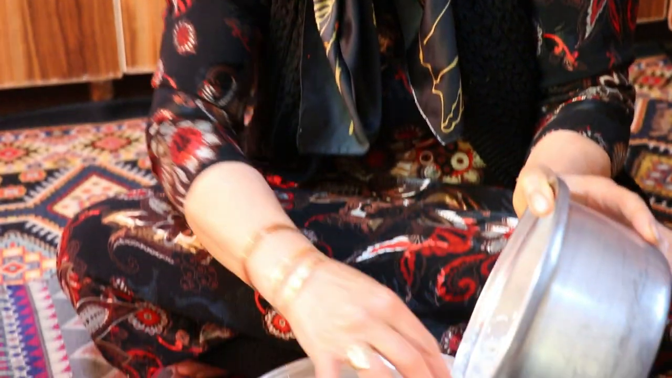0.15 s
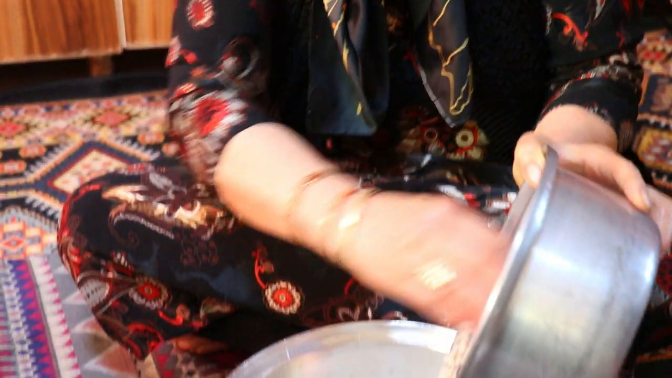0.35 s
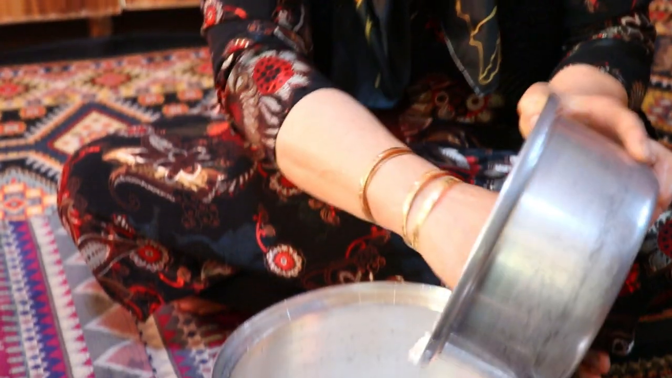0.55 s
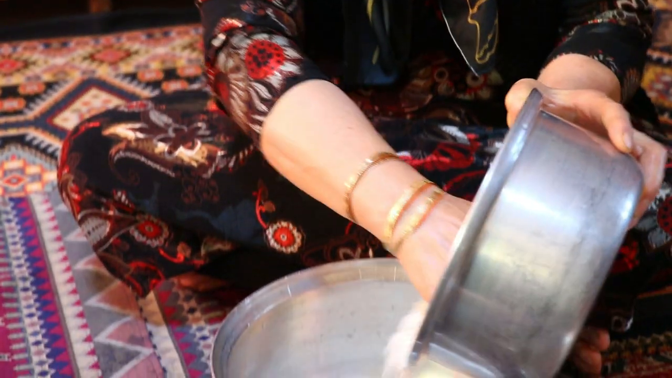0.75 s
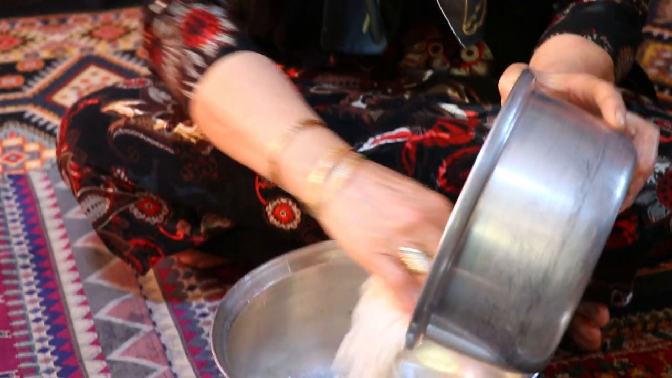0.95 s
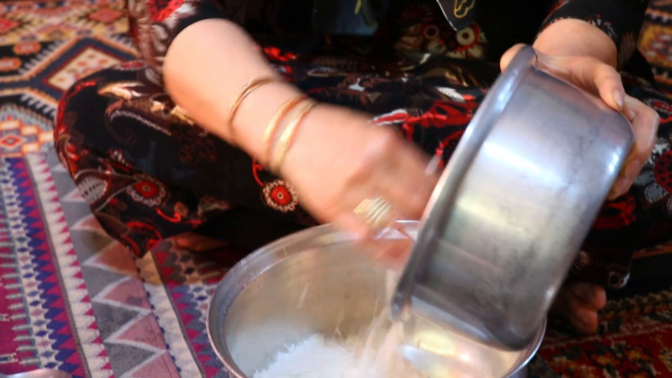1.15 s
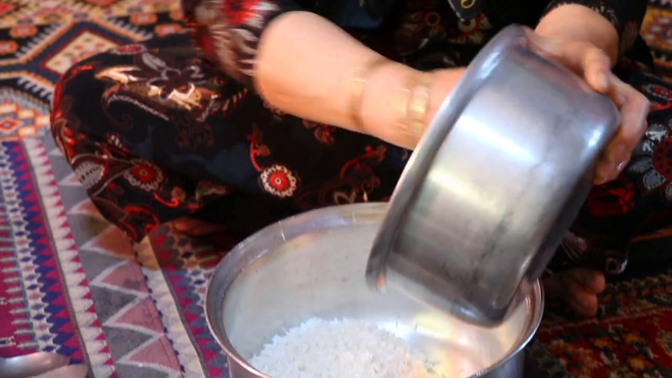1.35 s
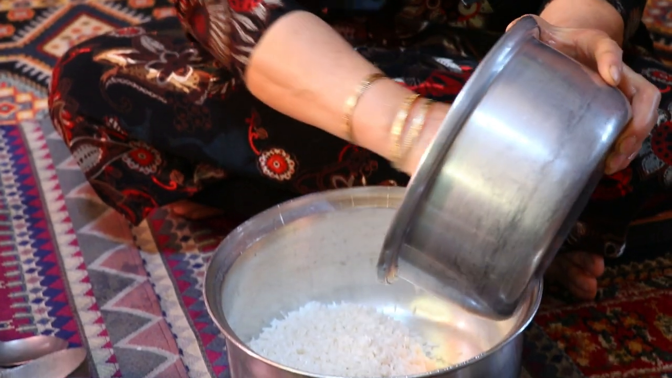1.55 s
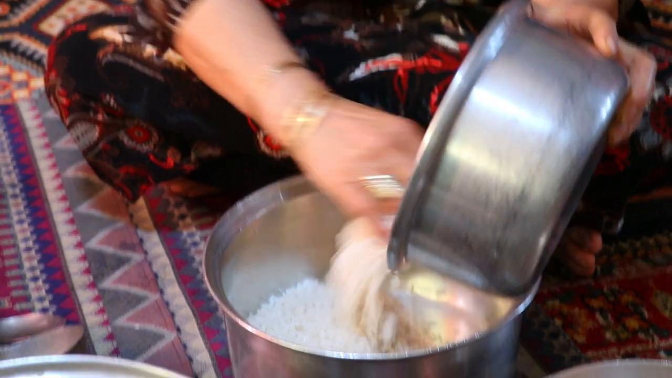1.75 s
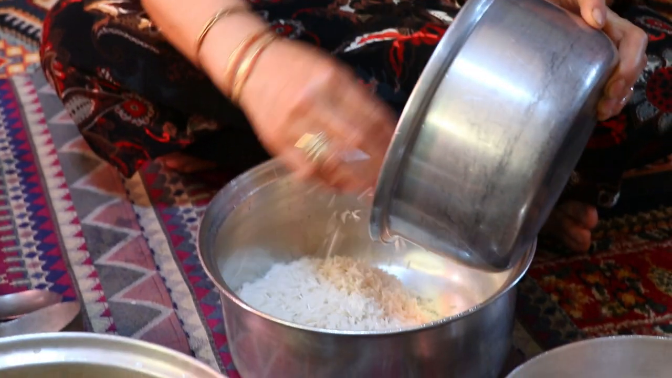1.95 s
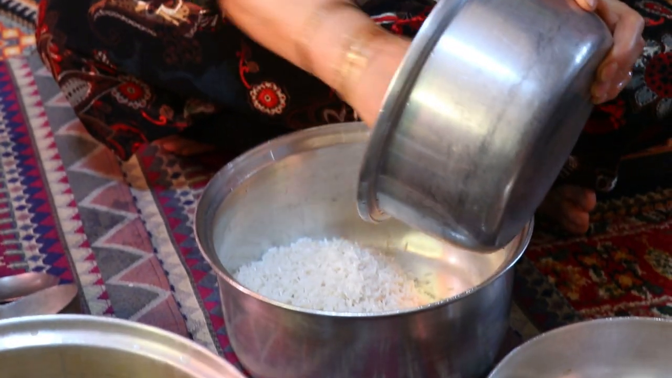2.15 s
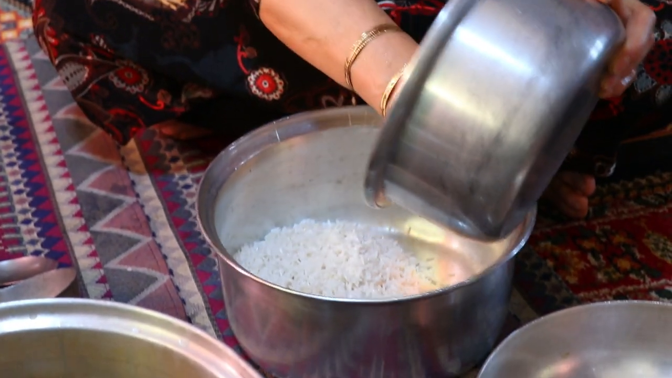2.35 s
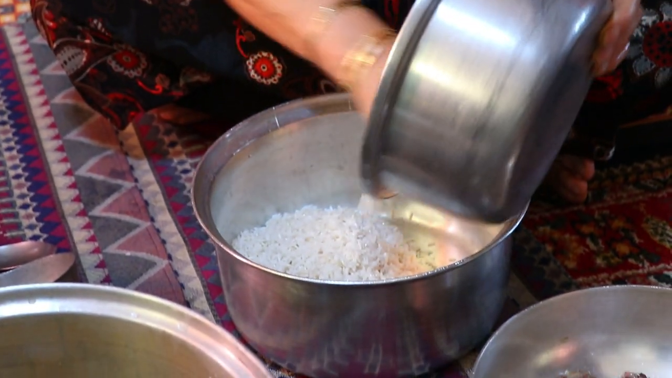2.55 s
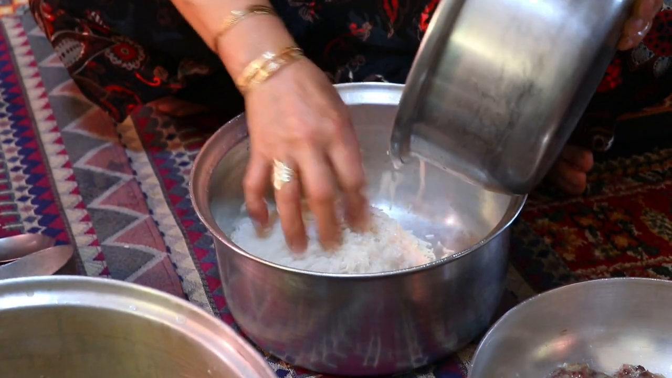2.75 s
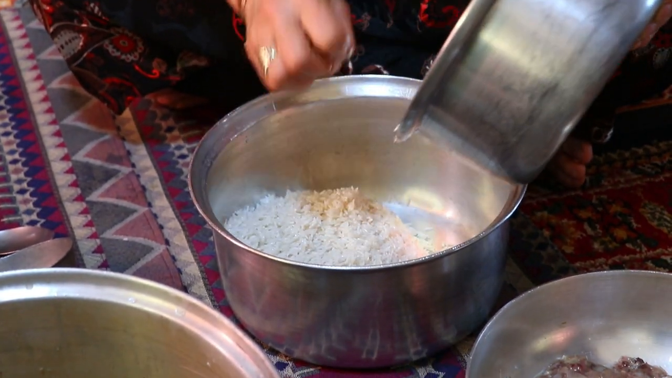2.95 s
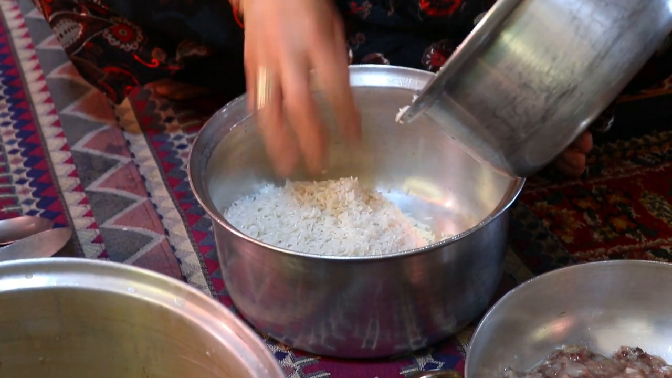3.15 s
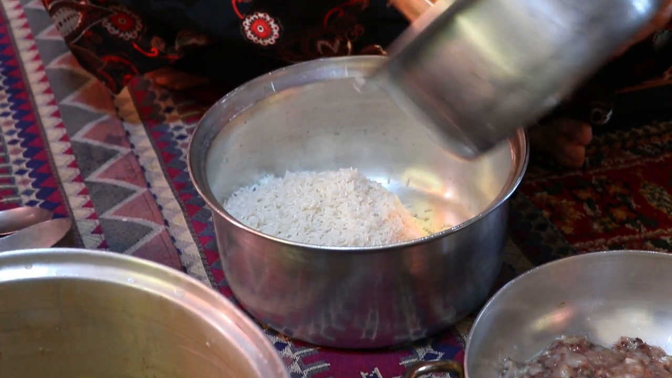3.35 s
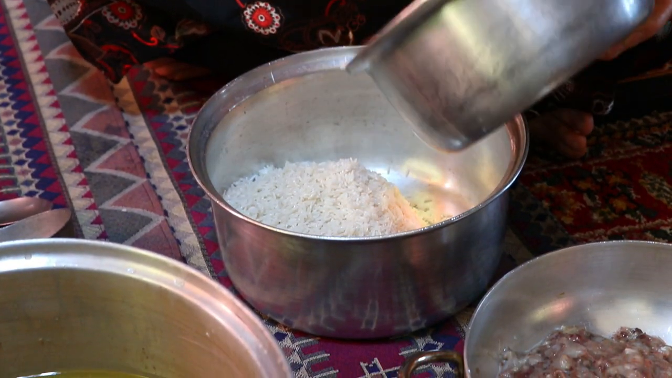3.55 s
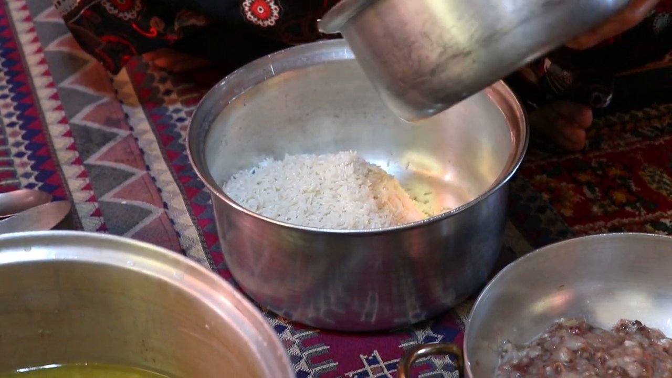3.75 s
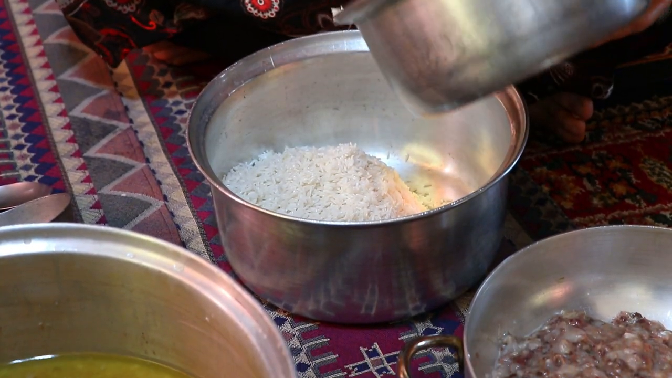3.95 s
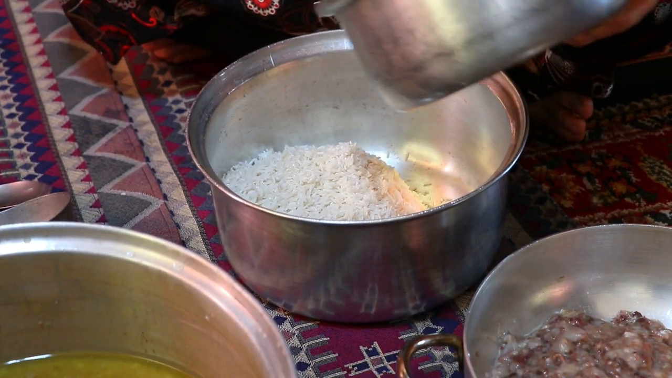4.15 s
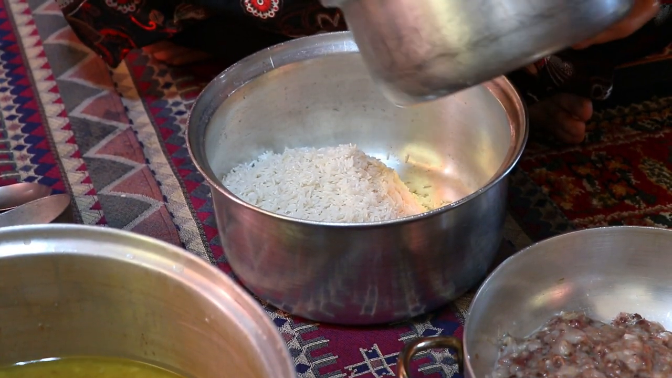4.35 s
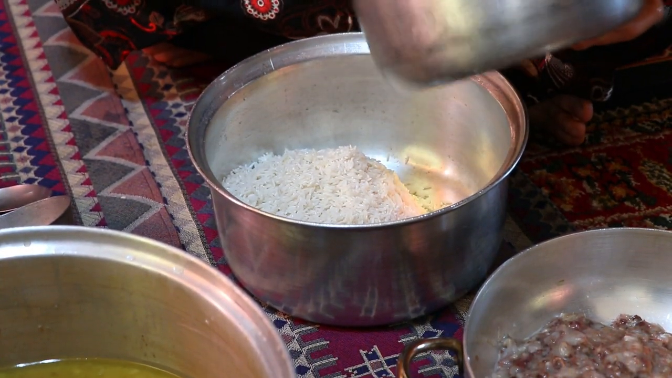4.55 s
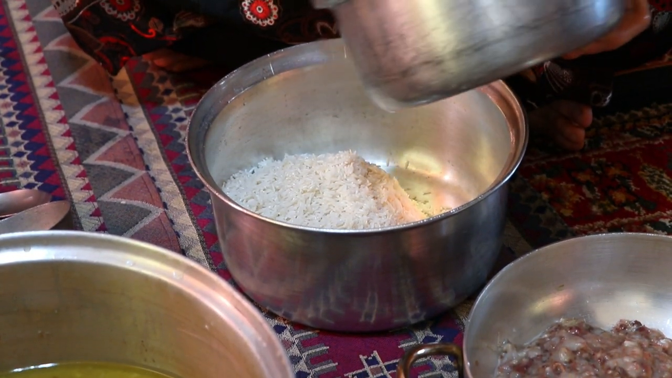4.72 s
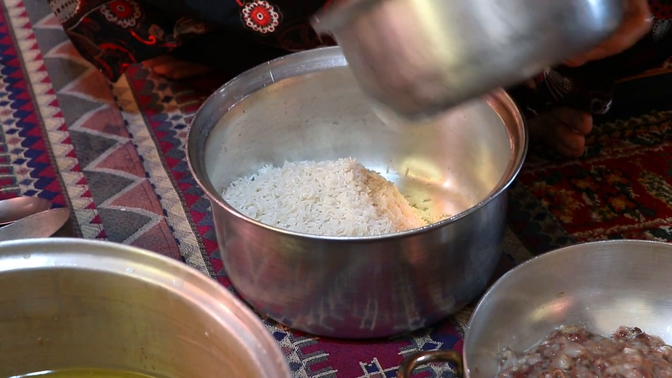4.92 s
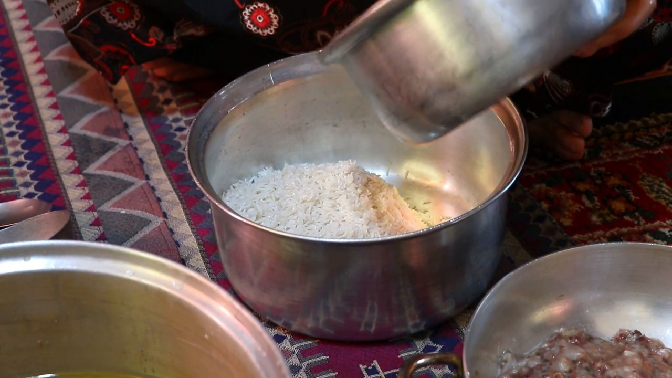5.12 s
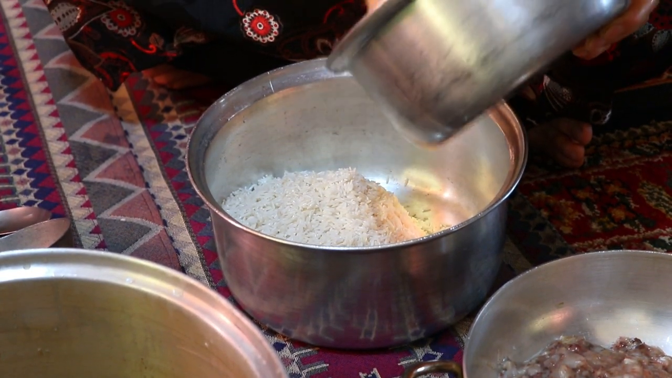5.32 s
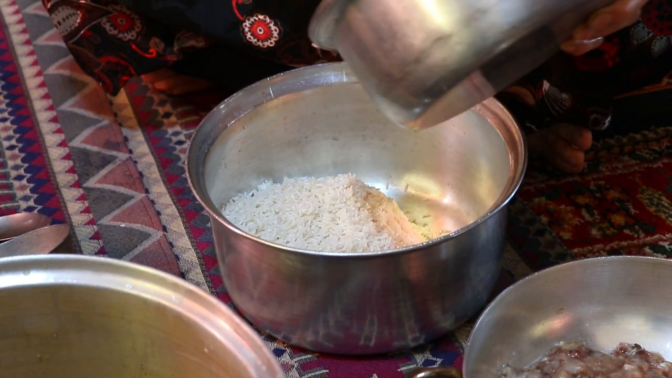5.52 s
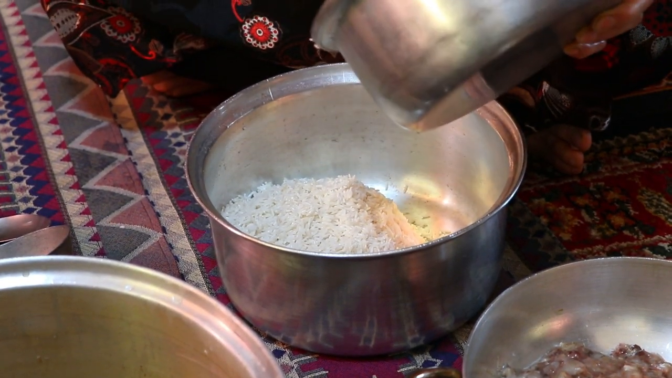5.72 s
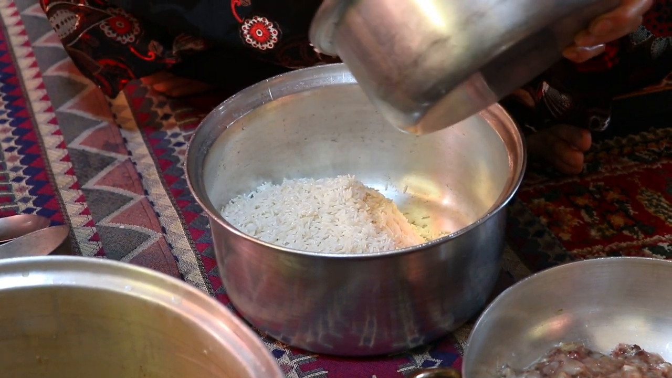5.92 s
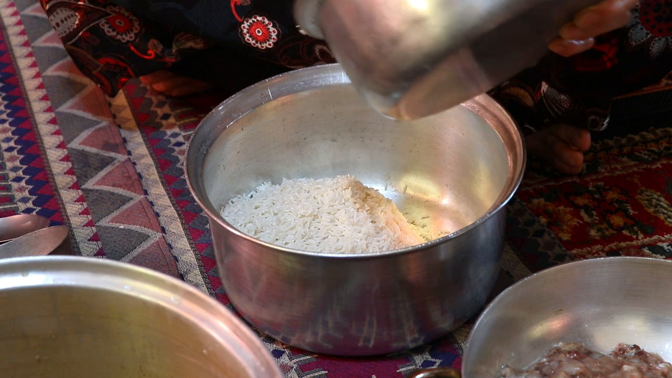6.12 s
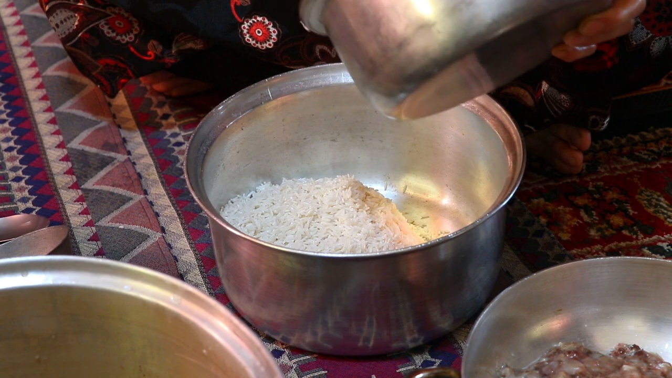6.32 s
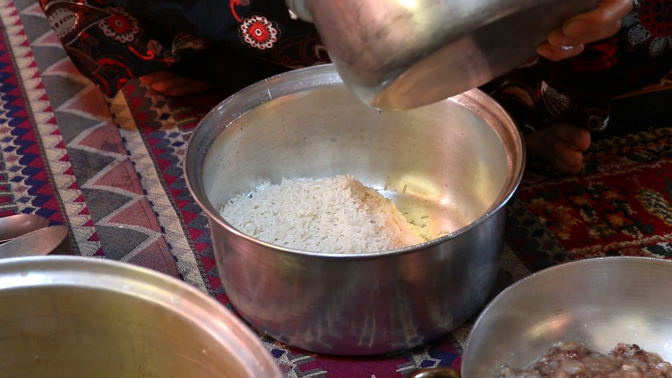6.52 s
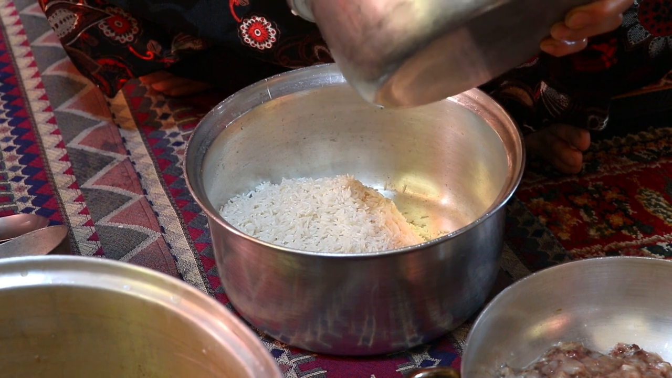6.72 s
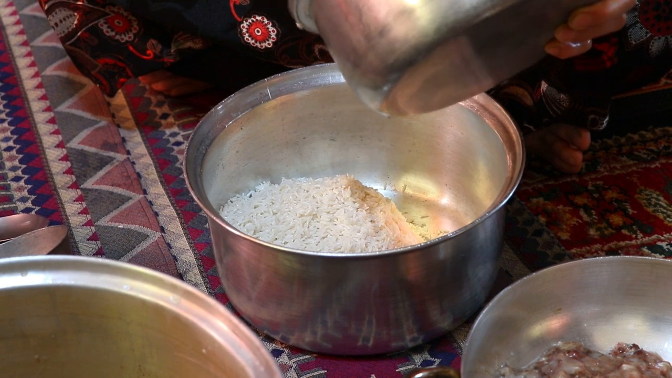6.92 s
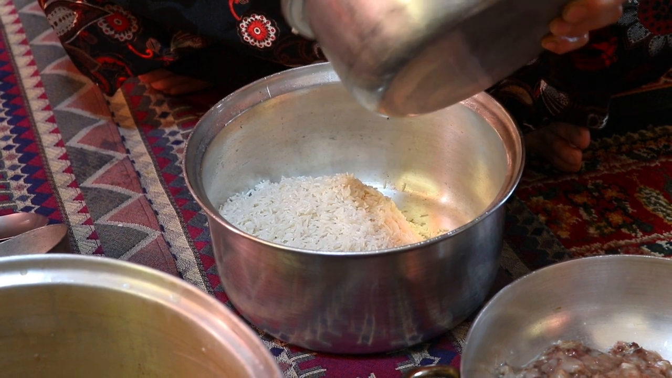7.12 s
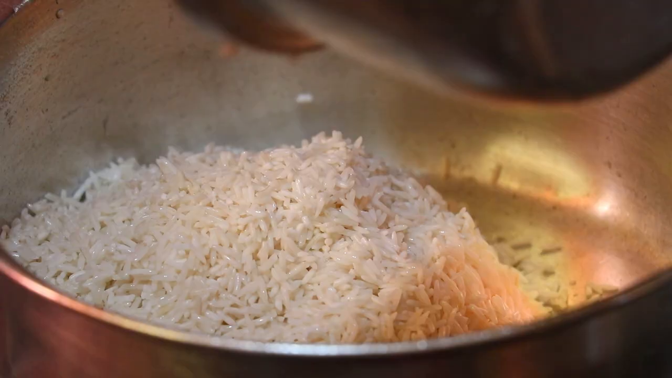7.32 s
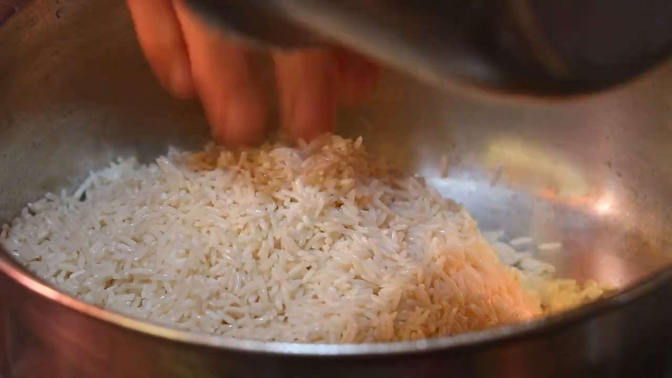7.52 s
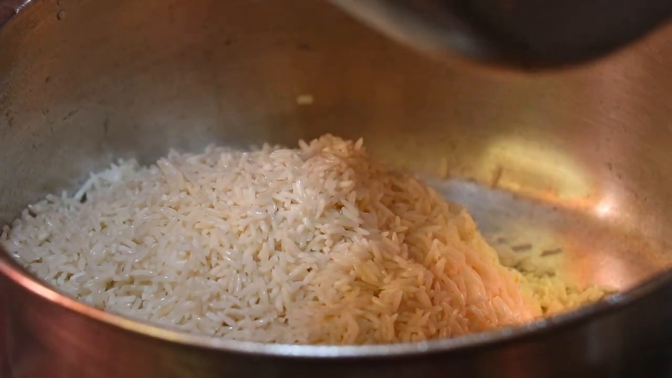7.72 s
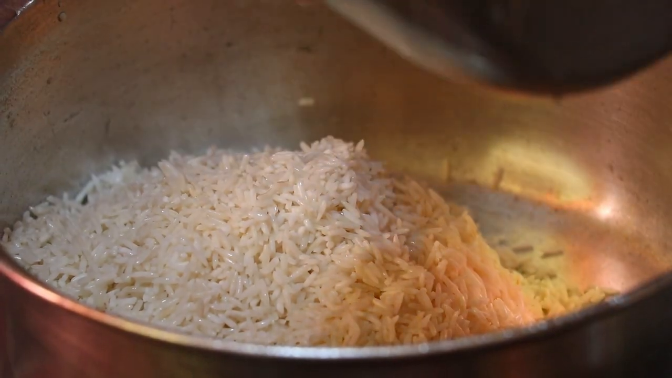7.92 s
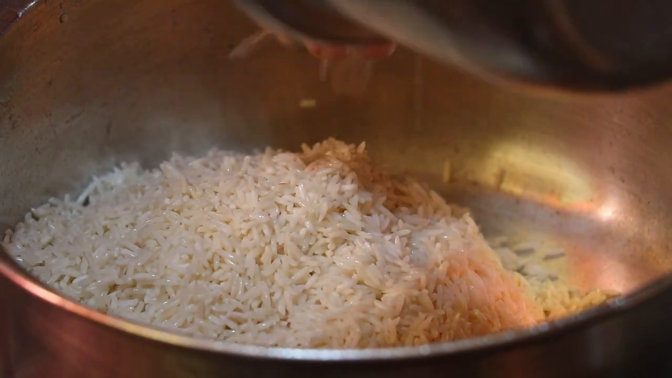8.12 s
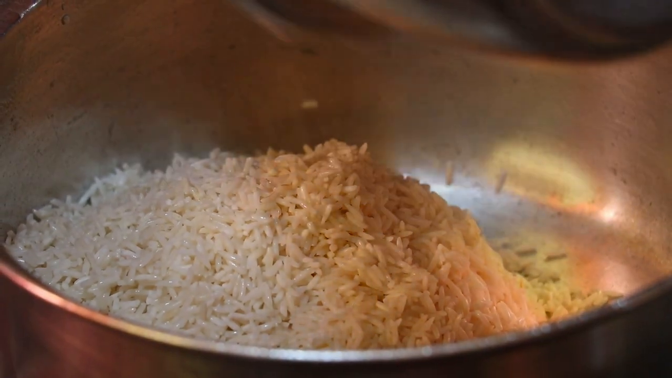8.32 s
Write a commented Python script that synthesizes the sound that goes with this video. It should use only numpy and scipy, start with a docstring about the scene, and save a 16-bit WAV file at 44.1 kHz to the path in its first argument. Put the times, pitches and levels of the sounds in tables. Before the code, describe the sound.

Close up in a quiet room, a hand scoops dry rice from one steel pot into another. Handfuls hiss over the metal and patter down while the hand knocks the pot and bangles jingle. After about three seconds it gets quieter, as fingers wipe out the last grains in short rubbing strokes with small ticks. Jewellery clacks hard on the rim once, and the wiping carries on.

```python
"""Dry rice scooped by hand from a tilted steel pot into a larger one on a carpet, close up in stereo.
For the first three seconds the hand knocks the pot, handfuls hiss over the steel and patter down,
and bangles jingle. Then the fingers wipe out the last grains stroke by stroke, sticking and slipping
on the wall, with small ticks. At 5.5 s jewellery clacks hard on the rim, and the wiping carries on."""
import sys
import numpy as np
from scipy import signal
from scipy.fft import rfft, irfft, next_fast_len
from scipy.io import wavfile

SR = 44100
rng = np.random.default_rng(int(sys.argv[2]) if len(sys.argv) > 2 else 0)


def to_wav(s):
    """Save 16-bit WAV."""
    ch = np.atleast_2d(s).T  # columns
    pcm = np.round(np.clip(ch, -1, 1) * 32767)  # PCM
    wavfile.write(sys.argv[1], SR, pcm.astype(np.int16))


N = 373527
AGE = np.arange(SR // 2) / SR  # time since a blow [s]

# how alike the two microphones hear a sound: (frequency [Hz], left-right correlation [0-1])
MIC_LIKENESS = [(30, 0.84), (130, 0.8), (500, 0.75), (2000, 0.41), (4000, 0.56), (8000, 0.57),
                (14000, 0.35)]
# spectra of a hard snap on steel and of crunching grains: (frequency [Hz], level [dB])
SNAP_SPECTRUM = [(200, -10), (900, -2.5), (2000, -6.5), (3000, -8.5), (5000, -6), (7300, 5), (10000, -2),
                 (13000, -8), (16000, -19)]
CRUNCH_SPECTRUM = [(200, -30.5), (700, 1), (1000, -11), (1400, -3), (2100, -2), (3000, 2.5), (3900, -1),
                   (4900, -9.5), (6500, -4), (12000, -21.5)]


def amp(db):
    """Decibels to gain."""
    return 10 ** (np.asarray(db) / 20)


def unit(x):
    """Scales to rms 1."""
    return x / np.sqrt(np.mean(x ** 2) + 1e-20)


def read(points, hz):
    """Reads a table on a log-frequency axis."""
    f, value = np.transpose(points)
    return np.interp(np.log(hz + 1), np.log(f), value)


def add(mix, s, sound):
    """Mixes a stereo sound in at time s."""
    part = mix[:, max(round(s * SR), 0):][:, :sound.shape[1]]
    part += sound[:, :part.shape[1]]


def tilt(points):
    """Filter gain from a smooth spectrum."""
    return lambda hz: amp(read(points, hz))


def body(peaks):
    """Filter gain from a set of resonances with steep skirts."""
    return lambda hz: np.sqrt(sum(amp(db) ** 2 / (1 + ((hz - f) / width) ** 2) ** 2
                                  for f, width, db in peaks))


def noise(drive, colour):
    """Coloured noise of strength drive at two microphones: alike in the bass, less so in the treble."""
    n = next_fast_len(len(drive))
    hz = np.fft.rfftfreq(n, 1 / SR)
    shared, apart = rfft(rng.standard_normal((2, len(drive))) * drive, n)
    same = np.clip(read(MIC_LIKENESS, hz), 0, 1)
    mid, side = shared * np.sqrt(1 + same), apart * np.sqrt(1 - same)
    return unit(irfft(np.array([mid + side, mid - side]) * colour(hz), n)[:, :len(drive)])


def grains(per_s, spread_db, clump_db, clump_s):
    """Tiny impacts of uneven size that come in clumps."""
    sizes = amp(spread_db * np.minimum(rng.exponential(1, N), 4))
    clumps = unit(signal.lfilter([1], [1, -np.exp(-1 / (clump_s * SR))], rng.standard_normal(N)))
    return (rng.random(N) < per_s / SR) * sizes * amp(clump_db * clumps)


def burst(points, t60, tail_db, tail_t60):
    """A contact that sets off countless close modes: a quick fall, then a weaker tail."""
    fall = amp(-60 * AGE / max(t60, 1e-3)) + amp(tail_db - 60 * AGE / tail_t60)
    return unit(noise(np.ones(len(AGE)), tilt(points)) * fall) * np.sqrt(np.mean(fall ** 2))


def ring(modes, vary_db):
    """Dying modes, weighted anew by each blow; high ones reach the two microphones out of step."""
    hz, db, t60 = np.transpose(modes)[:, :, None]
    weight = rng.standard_normal((len(modes), 1))
    same = np.clip(read(MIC_LIKENESS, hz), 0, 1)
    offset = rng.choice([-1, 1], (len(modes), 1)) * np.arccos(same) / 2
    polarity = (-1) ** np.arange(len(modes))[:, None]
    fall = polarity * amp(db + vary_db * weight - 60 * AGE / t60)
    pair = [(fall * np.sin(2 * np.pi * hz * AGE + side * offset)).sum(0) for side in (1, -1)]
    return np.array(pair) / np.linalg.norm(amp(db))


def strokes(rows, attack_s, release_t60):
    """Gain from (start [s], length [s], level [dB], swell [dB]): each rises, swells or sags, dies."""
    t = np.arange(0, N, 32) / SR
    start, length, db, swell_db = np.transpose(rows)[:, :, None]
    age = t - start
    hold_db = db + swell_db * (np.clip(age / length, 0, 1) - .5)
    release_db = 60 * np.maximum(age - length, 0) / release_t60
    gain = np.clip(age / attack_s, 0, 1) * amp(hold_db - release_db)
    return np.interp(np.arange(N) / SR, t, np.linalg.norm(gain, axis=0))


def room_tone():
    """Steady room noise with a faint hum."""
    # noise spectrum and hum tones: (frequency [Hz], level [dB])
    air_spectrum = [(25, -13), (70, -8), (130, -6), (270, -11.5), (450, -11.5), (620, -13), (850, -22),
                    (1500, -21.5), (2500, -22.5), (4800, -31.5), (7000, -27.5), (11000, -30.5),
                    (16000, -41.5)]
    hum_tones = [(118.4, -76), (441.4, -69)]
    t = np.arange(N) / SR
    hum = sum(amp(db) * np.sqrt(2) * np.sin(2 * np.pi * (hz * t + rng.random())) for hz, db in hum_tones)
    return amp(-61.5) * noise(np.ones(N), tilt(air_spectrum)) + hum


def room_tail(x):
    """The short reverberation of a carpeted room."""
    decay_times = [(200, 0.28), (1000, 0.53), (4000, 0.34), (12000, 0.18)]  # (frequency [Hz], t60 [s])
    hz, t, spectra = signal.stft(noise(np.ones(len(AGE)), np.ones_like), SR, nperseg=256)
    fall = amp(-60 * t / read(decay_times, hz)[:, None])
    tail = signal.istft(spectra * fall, SR, nperseg=256)[1][:, :len(AGE)]
    tail *= np.minimum(AGE / 0.018, 1)
    return signal.fftconvolve(x, tail / np.linalg.norm(tail[0]), axes=1)[:, :N]


def inside_pot(x, bounce_db, bounce_t60):
    """Treble bounces to and fro between the steel walls, which sing along at their own pitches."""
    steel_peaks = [(1432, 14, 7), (4063, 25, 3), (5362, 12, 4), (6474, 16, 3.5), (7356, 16, 4),
                   (8604, 10, 5), (10788, 16, 5)]  # sharp wall resonances: (frequency [Hz], width [Hz], gain [dB])
    bounces = noise(np.ones(len(AGE)), lambda hz: hz ** 2 / (hz ** 2 + 2500 ** 2))
    bounces *= amp(-60 * AGE / bounce_t60)
    x = x + amp(bounce_db) * signal.fftconvolve(x, bounces / np.linalg.norm(bounces[0]), axes=1)[:, :N]
    n = next_fast_len(N)
    hz = np.fft.rfftfreq(n, 1 / SR)
    sing = 1 + sum((amp(db) - 1) / (1 + 2j * (hz - f) / width) for f, width, db in steel_peaks)
    return irfft(rfft(x, n) * sing, n)[:, :N] / np.hypot(1, amp(bounce_db))


def ticks():
    """Nails and grain clumps hit the steel: a bright snap, and a clink pitched by where they strike."""
    contacts = [(0.0763, -24, -41, 1150, 0.014), (0.1235, -22, -35, 3680, 0.0029),
                (0.173, -21.5, -34, 1065, 0.0078), (0.3307, -30, -54, 3200, 0.004),
                (0.3935, -26.5, -64, 1640, 0.00084), (0.4568, -25.5, -45, 2500, 0.002),
                (0.4944, -24.5, -43, 1550, 0.00077), (0.586, -45, -48, 1840, 0.011),
                (0.8427, -28.5, -44, 1360, 0.0039), (1.4019, -36, -58, 1210, 0.0038),
                (1.482, -36.5, -72, 1130, 0.0029), (1.921, -33.5, -54, 3260, 0.0028),
                (1.939, -36, -58, 3260, 0.003), (2.9107, -30.5, -48, 2380, 0.0016),
                (4.1263, -43, -52.5, 1490, 0.0027), (4.1989, -38.5, -49.5, 2930, 0.0027),
                (4.472, -33.5, -49.5, 2820, 0.0025), (4.784, -43.5, -56, 2170, 0.0052),
                (4.9828, -50, -44, 3350, 0.0031), (5.1497, -38.5, -46, 1013, 0.0052),
                (7.1023, -39.5, -39, 3380, 0.0017), (7.21, -47, -42, 3280, 0.0043),
                (7.247, -58, -48.5, 997, 0.0036), (7.3937, -35, -56, 3630, 0.0024),
                (7.416, -42, -47, 2940, 0.0023), (7.5283, -31.5, -40, 2560, 0.0017),
                (7.606, -43, -46.5, 1350, 0.0017), (7.621, -35.5, -66, 3800, 0.0064)]  # (time [s], snap [dB], wall ring [dB], wall pitch [Hz], chatter [s])
    clink_spectrum = [(300, -14), (1100, 0), (1500, -6), (2100, -0.5), (3100, 2), (3900, -2.5), (5000, -25),
                      (6400, 0), (10000, -46)]  # (frequency [Hz], level [dB])
    out = np.zeros((2, N))
    for s, snap_db, wall_db, hz, chatter in contacts:
        add(out, s, amp(snap_db - 5) * burst(SNAP_SPECTRUM, t60=6 * chatter, tail_db=-14, tail_t60=0.28))
        add(out, s, amp(wall_db - 8) * burst(clink_spectrum, t60=8 * chatter, tail_db=-1, tail_t60=0.19))
        modes = [(hz, 0, 18 * chatter), (hz * 1.6, -9, 14 * chatter)]
        add(out, s, amp(wall_db + 3) * ring(modes, vary_db=0))
    return out


def jewellery():
    """Bangles hit each other at the wrist; once a hard edge strikes the rim of the pot."""
    jingles = [(1.9663, -29), (1.9775, -24.5), (2.0149, -34), (2.0556, -37), (2.8276, -32.5), (2.832, -24),
               (2.8416, -24), (2.8557, -33), (2.8734, -30), (3.1855, -28), (3.2305, -38)]  # (time [s], level [dB])
    jangle_spectrum = [(400, -39), (1800, -27), (2500, -5), (3400, -9.5), (4200, 7), (5100, 1.5), (7300, 9),
                       (9000, -0.5), (12000, -3.5), (16000, -15)]  # (frequency [Hz], level [dB])
    clack = (5.5478, -22, -13.5)  # the blow on the rim: (time [s], crack [dB], ring [dB])
    # modes of the bangles and of the rim: (frequency [Hz], level [dB], t60 [s])
    bangle_modes = [(2440, -1.5, 0.4), (2616, -1, 0.21), (2900, -21, .25), (3480, -4, 0.31),
                    (4070, 8.5, 0.14), (4300, 3, 0.19), (4580, -10.5, 0.17), (5380, 6, 0.097),
                    (6240, 9, 0.16), (6360, 3, .15), (6500, -6, 0.074), (7400, 18.5, 0.073),
                    (8250, -13, .15), (12000, -13, .15)]
    rim_modes = [(725, -25.5, 0.32), (1013, -8, 0.062), (1182, -17, 0.079), (1870, -7, 0.05),
                 (2068, -8.5, 0.051), (2000, -23.5, 0.41), (2088, 4, 0.044), (2490, -13, 0.064),
                 (2660, -2, 0.017), (2860, -16, 0.06), (3530, -15, 0.045), (3830, -9.5, 0.027),
                 (4360, -10.5, 0.031), (6680, -22, .1), (7630, -34, .1), (8200, -24, 0.14),
                 (2036, -19, 0.28)]
    out = np.zeros((2, N))
    for s, db in jingles:
        add(out, s, amp(db - 10) * ring(bangle_modes, vary_db=2))
        add(out, s, amp(db - 8.5) * burst(jangle_spectrum, t60=0.13, tail_db=-8.5, tail_t60=0.17))
    s, crack_db, ring_db = clack
    to_right = amp([[-1], [1]])
    add(out, s, to_right * amp(crack_db) * burst(SNAP_SPECTRUM, t60=.015, tail_db=-25, tail_t60=.17))
    add(out, s, to_right * amp(crack_db - 8) * burst(CRUNCH_SPECTRUM, t60=.05, tail_db=-14, tail_t60=.2))
    add(out, s + .0005, to_right * amp(ring_db) * ring(rim_modes, vary_db=-0.5))
    return out


def hand_knocks():
    """Knocks boom in the rice-laden pot and ring its wall; fingertips give only a dull pat."""
    knocks = [(0.019, -23, -36, -45, -57, 0.0051), (0.06, -32, -53, -30, -37, 0.015),
              (0.585, -59, -53, -41.5, -46, 0.003), (0.803, -29, -31.5, -34, -45.5, 0.0044),
              (0.969, -33, -34.5, -32.5, -42.5, 0.0028), (0.982, -34.5, -38, -38, -45.5, 0.006),
              (1.601, -28.5, -31, -30, -38.5, 0.0031), (2.221, -31, -53, -32.5, -39.5, 0.0048),
              (2.227, -34.5, -37, -26, -36.5, 0.0065), (2.533, -31, -34, -29.5, -42.5, 0.012)]  # (time [s], thud [dB], wall ring [dB], clank [dB], click [dB], chatter [s])
    pats = [(0.415, -43, 0.088), (2.212, -45, 0.08), (3.472, -40.5, 0.11), (3.486, -36, 0.11),
            (4.105, -41, 0.096), (4.813, -29.5, 0.063), (4.815, -32.5, 0.061), (5.148, -42, 0.12),
            (5.212, -43, 0.13), (5.857, -38.5, 0.23), (6.482, -39, 0.05), (7.147, -38, 0.043),
            (7.246, -48, 0.074), (7.414, -40.5, 0.082), (7.841, -44.5, 0.082), (8.356, -41, 0.049),
            (8.385, -54, 0.23)]  # (time [s], level [dB], t60 [s])
    pot_modes = [(195, -11, .25), (335, -6, .3), (383, -5, .3), (412, -5, .3), (450, -4, .3), (536, -2, .3),
                 (630, -5, .3), (680, 0, .3), (996, -6, .35), (1428, -5, .35), (1640, -7, .2),
                 (2060, -8, .25), (2258, -4, .22), (2480, -3, .2), (2557, -6, .3), (2635, -1, .27),
                 (2905, -4, .22), (3400, -11, .25), (3920, -6, .18), (4063, 0, .17), (4240, -4, .18),
                 (4330, -6, .18), (4950, -12, .2), (5362, -11, .22), (6474, -10, .2), (7356, -10, .2)]  # the hand-held pot: (frequency [Hz], level [dB], t60 [s])
    # spectra of the contacts: (frequency [Hz], level [dB])
    thud_spectrum = [(60, -45), (150, -73), (180, -7), (220, -3), (265, -10), (340, 5), (500, 8),
                     (690, 4.5), (800, -13.5), (1200, -37), (2500, -13.5), (8000, -47)]
    clank_spectrum = [(300, -35), (800, -1.5), (1020, 5), (1200, -5.5), (1420, -7), (1680, -1), (1900, -7),
                      (2500, 2.5), (3300, -13.5), (4100, 2), (5000, -2), (10000, -26.5)]
    pat_spectrum = [(60, -23), (150, -21), (230, -2), (450, -1), (650, 0), (900, -17.5), (1400, -19.5),
                    (3000, -37), (8000, -30), (16000, -63.5)]
    out = np.zeros((2, N))
    for s, thud_db, ring_db, clank_db, click_db, chatter in knocks:
        flesh = np.minimum(AGE / 0.0018, 1)  # a soft hand builds up its push gradually
        thud = burst(thud_spectrum, t60=0.31, tail_db=-20.5, tail_t60=0.66)
        add(out, s, amp(thud_db - 2.5) * flesh * thud)
        add(out, s, amp(thud_db - 2) * ring(pot_modes[:8], vary_db=2))
        add(out, s, amp(ring_db - 1.5) * ring(pot_modes[8:], vary_db=1.8))
        add(out, s, amp(clank_db - 6) * burst(clank_spectrum, t60=0.12, tail_db=-14.5, tail_t60=0.4))
        add(out, s, amp(click_db + 2) * burst(SNAP_SPECTRUM, t60=7 * chatter, tail_db=-7, tail_t60=0.24))
    for s, db, t60 in pats:
        fingertip = np.minimum(AGE / 0.0027, 1)
        add(out, s, amp(db - 6.5) * fingertip * burst(pat_spectrum, t60, tail_db=-10.5, tail_t60=0.41))
    return out


def wiping():
    """Fingers stick and slip on the wall; their height decides if low or high resonances answer."""
    # (start [s], length [s], level [dB], swell [dB], first height on the wall [0-1], last height [0-1])
    wipes = [(1.37, .17, -55, 2, 0.44, 0.1), (3.538, 0.1, -44, 2, 0.04, 0.43),
             (3.754, 0.054, -49, -4, 0.2, .1), (3.859, 0.059, -49, 7, 0.3, 0.5),
             (4.138, .26, -56, 0, 0.4, 0.2), (4.54, 0.066, -59.5, 6, 0.8, .8),
             (4.883, 0.24, -55.5, -9, 0.96, 0.3), (5.15, 0.18, -55, 4, 0.4, .3),
             (5.564, 0.13, -46, 1, 0.4, 0.3), (5.871, .14, -47, 12, 0.8, 0.34),
             (6.191, 0.096, -45, 0, 0.33, 0.48), (6.481, 0.14, -50.5, 2, 0, 0.4),
             (6.664, .06, -61, 5, 1, 0.5), (6.832, .09, -48, -6, 0, 0.38), (7.112, .035, -52.5, -1, 0, 0.6),
             (7.23, 0.021, -54, 0, .3, 0.6), (7.293, 0.042, -50, 5, .85, 0.76),
             (7.83, 0.28, -61.5, 4, 0.66, 0.14)]
    brushes = [(4.5, 0.1, -61, 7), (4.65, 0.021, -63, -5), (5.89, 0.12, -71, -10), (6.65, 0.025, -61, -1),
               (7.21, 0.028, -58.5, -9), (7.98, 0.12, -65.5, 24.5), (8.41, .06, -57, -2)]  # light strokes: (start [s], length [s], level [dB], swell [dB])
    plucks = [(1.385, -44.5), (3.757, -44), (6.198, -37.5), (6.242, -39), (6.835, -37.5), (6.868, -46),
              (7.335, -45)]  # a pressed finger breaks loose: (time [s], level [dB])
    # wall resonances when rubbed and when lightly brushed: (frequency [Hz], width [Hz], level [dB])
    wall_peaks = [(418, 22, -13.5), (614, 60, -2.5), (724, 28, 8), (860, 64, -5.5), (1084, 30, -1.5),
                  (1172, 122, -6), (1270, 62, -26), (1627, 110, -16.5), (2246, 100, -16), (3130, 52, -15)]
    brushed_peaks = [(1060, 95, -5.5), (1740, 92, -22.5), (2044, 45, 7), (2200, 44, -5), (2837, 45, 7),
                     (3310, 100, 5), (3660, 100, -8), (6330, 190, -0.5), (8980, 1700, -9.5)]
    slips = grains(per_s=4000, spread_db=.8, clump_db=.8, clump_s=.004)
    path = [point for s, length, _, _, first, last in wipes for point in ((s, first), (s + length, last))]
    height = np.clip(np.interp(np.arange(N) / SR, *np.transpose(sorted(path))), 0, 1)
    rub = np.sqrt(1 - height) * noise(slips, body(wall_peaks[:4]))
    rub += np.sqrt(height) * noise(slips, body(wall_peaks[4:]))
    brush = noise(grains(per_s=2100, spread_db=1.5, clump_db=1.5, clump_s=.005), body(brushed_peaks))
    out = amp(-1.1) * strokes([row[:4] for row in wipes], attack_s=0.017, release_t60=0.18) * rub
    out += amp(6.5) * strokes(brushes, attack_s=0.02, release_t60=0.13) * brush
    wall_modes = [(hz, db, np.log(1000) / (np.pi * width)) for hz, width, db in wall_peaks]
    for s, db in plucks:
        add(out, s, amp(db + 1.5) * ring(wall_modes, vary_db=-1.5))
    return out


def rice():
    """Grains hiss over steel, crunch under the fingers, and drum on the bottom where they land."""
    # the hand pushes the rice:
    # (start [s], length [s], hiss [dB], crunch [dB], swell [dB], share of loose grains [0-1])
    pushes = [(-0.02, 0.098, -33, -37.5, 5.5, 0.07), (0.111, .095, -31, -36.5, -6.5, 0.25),
              (0.24, 0.08, -39.5, -58, -8.5, 0.26), (0.577, 0.27, -60, -52, 2, .05),
              (0.82, .24, -62, -57.5, 15.5, .05), (1.078, 0.16, -45, -55.5, -5.5, 0.25),
              (1.477, 0.092, -57, -59, 1, 0.05), (1.679, 0.18, -55.5, -51.5, 5, 0),
              (1.89, 0.17, -53, -62, 0, 0.5), (2.284, 0.041, -56.5, -66, 1, .3),
              (2.39, .125, -58, -52.5, 8, 0.2), (2.576, 0.16, -59, -53, -8, 0.14),
              (2.724, 0.21, -49.5, -55.5, -14.5, 0.23), (3.103, 0.17, -59, -72, -5, 0),
              (3.49, .14, -58, -55, 4.5, 0.3), (3.635, 0.027, -44, -57, -1, 0.66),
              (3.727, 0.17, -68, -64, -2, 0.7), (3.858, 0.11, -54.5, -58.5, -3.5, 0.47),
              (4.07, 0.18, -61.5, -64, 7, 0.5), (4.256, 0.058, -56, -56.5, 0, 0.4),
              (4.836, 0.21, -63, -57.5, 6.5, 0.9), (5.122, 0.2, -61.5, -61.5, -4, 0.2),
              (5.334, 0.084, -54, -56.5, -7, 0.64), (5.539, .15, -51.5, -54, -7.5, 0.35),
              (5.866, 0.15, -60, -58.5, -3.5, 0.1), (6.166, 0.13, -66, -62, -1, 0),
              (6.455, 0.2, -71.5, -72, 0, 0.3), (6.642, .03, -58, -59, -2, 0),
              (6.827, 0.063, -67, -69, 0, 0), (7.184, 0.18, -72, -68, 1, .1),
              (7.93, 0.13, -62.5, -69, 4, 0.6), (8.406, 0.042, -54.5, -69, -8, 0.3)]
    landings = [(-0.02, 0.06, -28.5, -6), (0.15, 0.046, -35.5, -0.5), (0.41, 0.043, -50.5, -1),
                (0.8, 0.36, -51.5, 2), (1.49, .08, -60, 0), (1.72, 0.062, -41, 9), (1.95, 0.056, -44, -3),
                (2.3, .17, -50, 8), (2.57, .13, -50, -4)]  # handfuls come down: (start [s], length [s], level [dB], swell [dB])
    bottom_peaks = [(207, 14, -30), (322, 26, -6), (393, 61, 4), (438, 33, 4.5), (452, 50, -5.5),
                    (547, 57, 4.5), (583, 14, -20), (693, 19, 2), (980, 80, -19.5), (1430, 14, -12.5)]  # pot bottom under rice: (frequency [Hz], width [Hz], level [dB])
    # rice sliding in bulk, and loose grains on bare steel: (frequency [Hz], level [dB])
    bulk_spectrum = [(150, -32), (400, -17.5), (1000, 3), (1900, -3.5), (3000, -2.5), (4700, -4.5),
                     (6000, 2.5), (7300, 3), (9000, 1.5), (11000, -4), (13500, -10), (16000, -17.5)]
    loose_spectrum = [(1000, -22), (3000, -11), (5000, -35), (7000, 0.5), (8500, 9), (11000, -1.5),
                      (14000, -6), (16000, -23)]
    sliding = grains(per_s=4500, spread_db=2.4, clump_db=1.4, clump_s=.007)
    pushed = grains(per_s=3500, spread_db=2, clump_db=1.4, clump_s=.007)
    landing = grains(per_s=2500, spread_db=1.5, clump_db=.8, clump_s=.008)
    start, length, hiss_db, crunch_db, swell_db, share = np.transpose(pushes)
    attack_s = 0.042  # grains start quickly and trickle on after the hand stops
    flow = strokes(np.transpose([start, length, hiss_db, swell_db]), attack_s, release_t60=0.43)
    pressure = strokes(np.transpose([start, length, crunch_db, swell_db]), attack_s, release_t60=0.35)
    loose = np.clip(np.interp(np.arange(N) / SR, start + length / 2, share), 0, 1)
    bulk = np.sqrt(1 - loose) * noise(sliding, tilt(bulk_spectrum))
    fizz = np.sqrt(loose) * noise(sliding, tilt(loose_spectrum))
    hiss = amp(1.5) * flow * (bulk + fizz)
    jumping = rng.random(N) < 120 / SR * flow / flow.max()  # 120 stray grains a second at full flow
    bounce = burst(SNAP_SPECTRUM, t60=.012, tail_db=-9, tail_t60=0.13)
    hits = jumping * rng.standard_normal(N)
    strays = amp(-62.5) * unit(signal.oaconvolve(hits[None], bounce, axes=1)[:, :N])
    crunch = amp(-1) * pressure * noise(pushed, tilt(CRUNCH_SPECTRUM))
    pour = strokes(landings, attack_s=0.0099, release_t60=0.51)
    drum = amp(-3.04) * pour * noise(landing, body(bottom_peaks))
    return hiss + strays + crunch + drum


def scene():
    """The pots stand near the microphones, a little to the right, with the room faint behind them."""
    balance = [(60, 0.5), (300, -1), (550, 0.1), (1200, -3), (2300, -4), (4400, -1.5), (8000, -3),
               (14000, -2)]  # (frequency [Hz], left minus right [dB])
    near = inside_pot(rice() + wiping() + ticks(), bounce_db=-6, bounce_t60=.035)
    # a low cut at 133 Hz keeps knocks and clinks free of deep thump
    low_cut = signal.butter(3, 133, "high", fs=SR, output="sos")
    near = signal.sosfilt(low_cut, near + hand_knocks() + jewellery())
    n = next_fast_len(N)
    lean_db = read(balance, np.fft.rfftfreq(n, 1 / SR)) / 2
    near = irfft(rfft(near, n) * amp([lean_db, -lean_db]), n)[:, :N]
    return near + amp(-15) * room_tail(near) + room_tone()


def record(dry):
    """The recorder's band limit at 16150 Hz."""
    low_pass = signal.firwin(511, 16150, window=("kaiser", 9), fs=SR)
    return signal.oaconvolve(dry, low_pass[None], "same")


dry = scene()
out = record(dry)
to_wav(out)
```